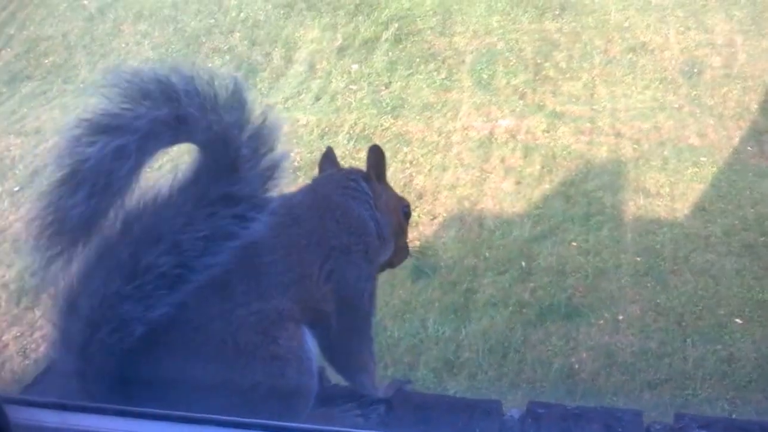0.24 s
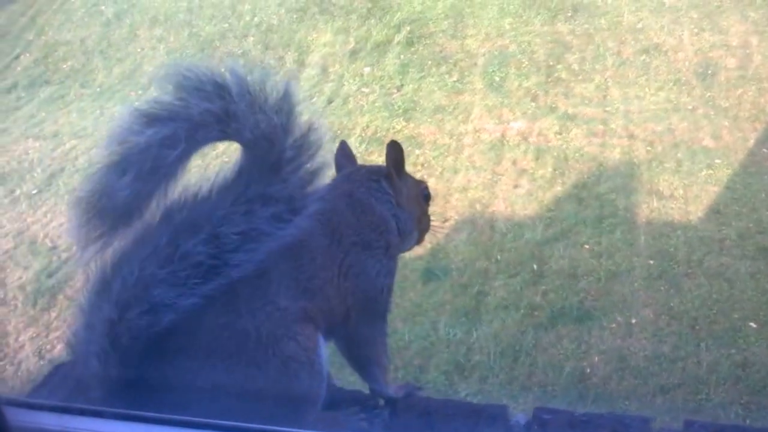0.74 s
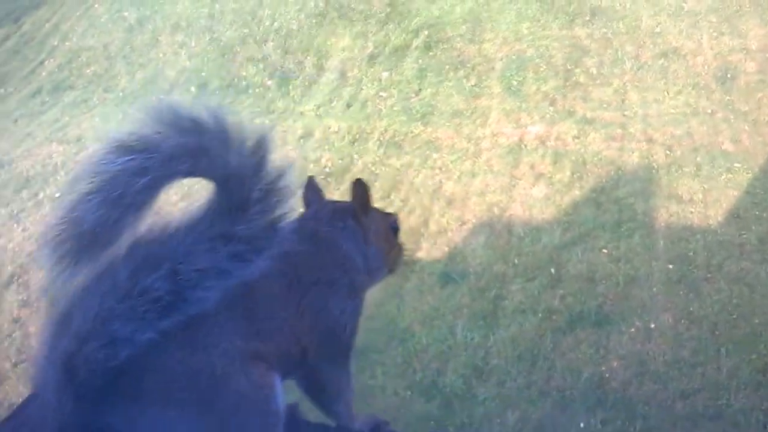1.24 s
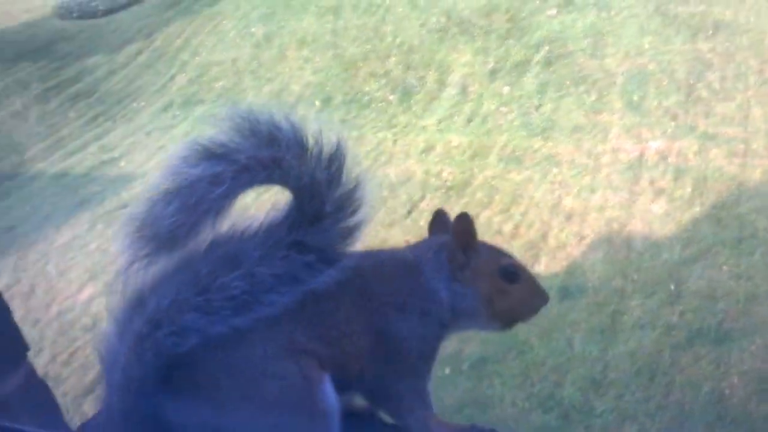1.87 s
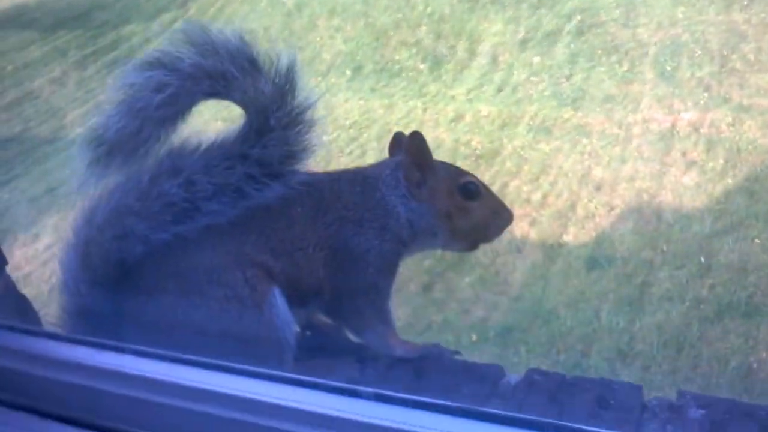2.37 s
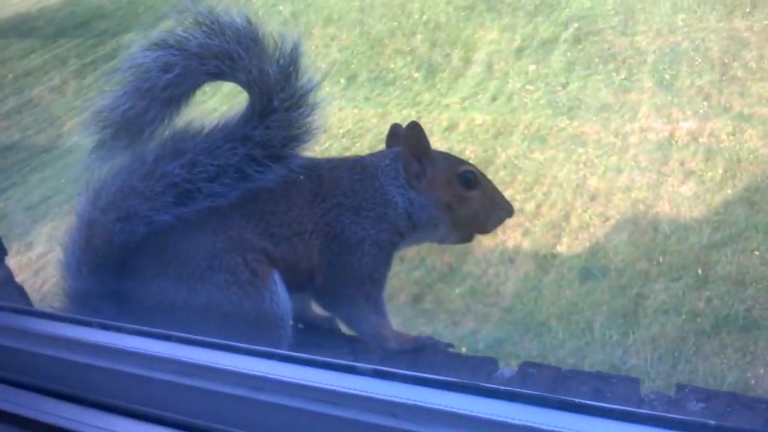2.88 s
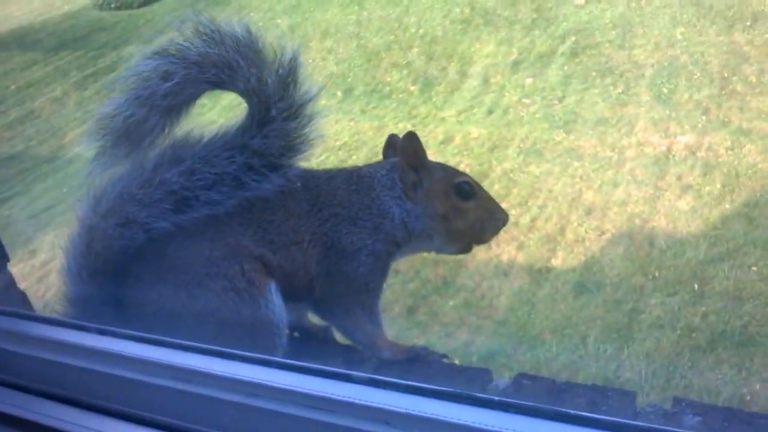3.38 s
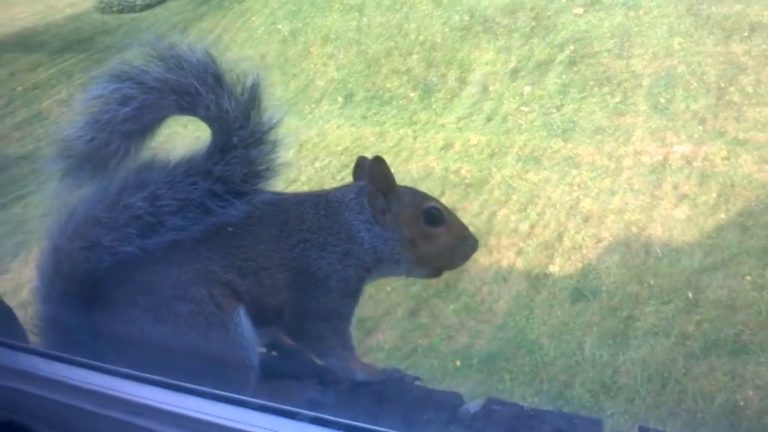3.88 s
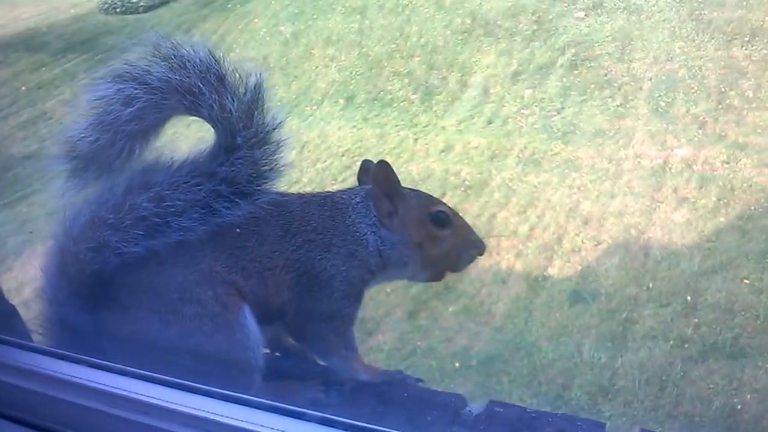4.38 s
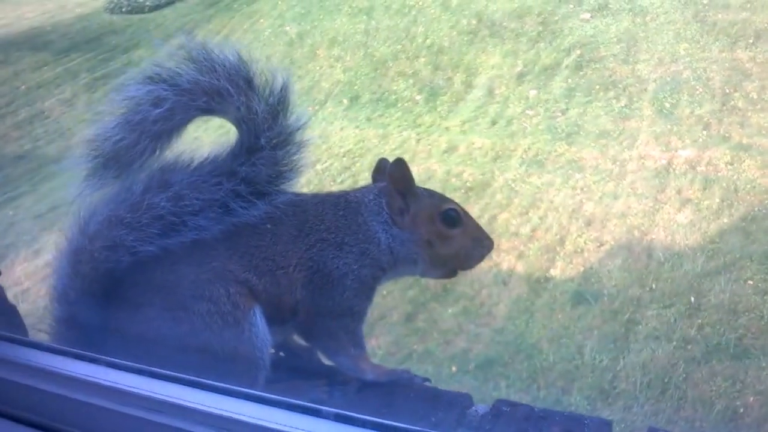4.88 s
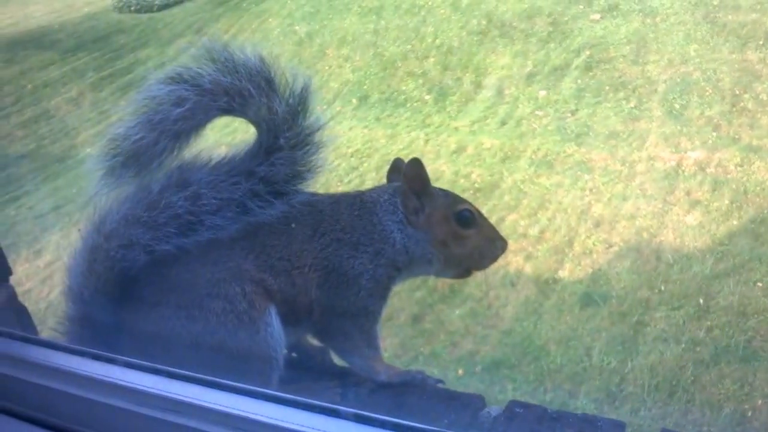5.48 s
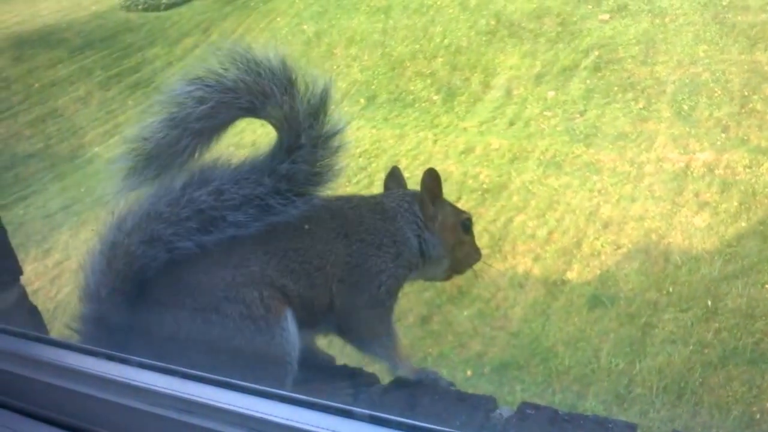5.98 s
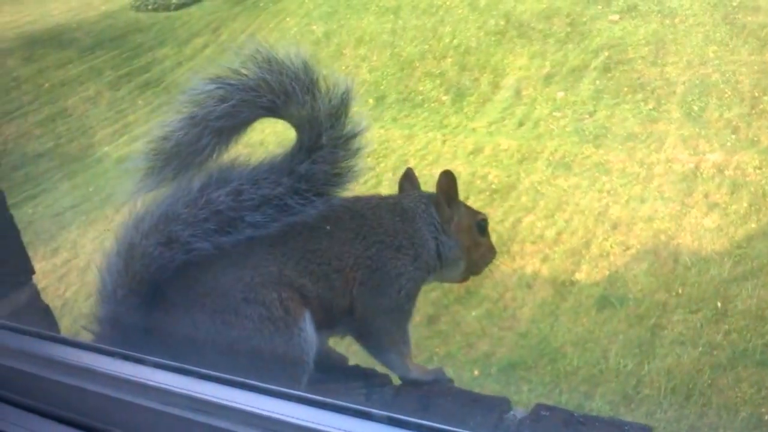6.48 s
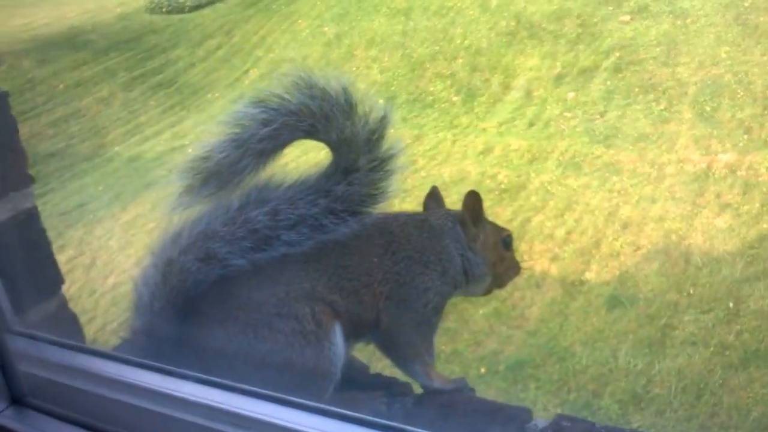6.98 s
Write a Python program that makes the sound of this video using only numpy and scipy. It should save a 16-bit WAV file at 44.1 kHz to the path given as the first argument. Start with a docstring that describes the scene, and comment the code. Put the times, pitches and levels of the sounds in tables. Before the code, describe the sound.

From behind a window, a squirrel is heard scolding close by: first a quick string of scratchy, squeaky barks mixed with slight shuffles and taps, then two long whines that crack and turn hoarse, then three barks and one more whine. The garden behind stays quiet, with a low rush of air, hissing insects, a far engine drone and a very faint whistle that comes and goes.

```python
"""A grey squirrel on a brick sill scolds with ten short raspy barks and three long whining squalls.
Its vocal folds beat strong-weak and slip between clean and rough; the throat sounds first, then the
mouth opens. Its fur and claws brush the sill, a few small knocks sound nearby, and the window recess
adds a brief echo. All is heard from behind the window, over a garden where the air rumbles softly,
insects hiss, a far engine drones and a faint whistle comes and goes."""
import sys
import numpy as np
from scipy import signal
from scipy.fft import rfft, irfft
from scipy.io import wavfile
from scipy.ndimage import uniform_filter1d

SR = 44100
rng = np.random.default_rng(int(sys.argv[2]) if len(sys.argv) > 2 else 0)


def digitize_waveform(pressure):
    """Quantize a signal to 16-bit integers and store it at the path in sys.argv[1].

    Rows of a 2-D input are taken as channels; values are limited to [-1, 1].
    """
    field = np.atleast_2d(pressure).T
    bounded = np.clip(field, -1, 1)
    quanta = np.round(bounded * 32767).astype(np.int16)
    wavfile.write(sys.argv[1], SR, quanta)


N = 318843
TIME = np.arange(N) / SR

# Barks: start t/s, main push delay/s, closing push delay/s, throat level/dB, main push level/dB,
# closing push level/dB, pitch f/Hz, roughness/0-1, sharpness/0-1, hiss level/dB,
# squeak level/dB against the mouth
BARKS = [ (0.191, 0.085, 0.093, -58, -52.5, -55, 641, 0.78, 1, -76, -20),
         (0.418, 0.04, .078, -52.5, -40.5, -51, 636.6, 0.42, 1, -57, -21),
         (0.636, 0.044, 0.073, -54, -43.5, -70, 617, 0.56, 0.98, -56, -15),
         (0.895, .037, 0.095, -56, -43.5, -54, 647.7, 0.59, 1, -56.5, 8),
         (1.196, 0.033, 0.094, -54.5, -46, -46.5, 638.4, 0.65, .71, -60, 13.5),
         (1.785, 0.049, 0.073, -48.5, -52, -53, 619, 0.53, 0.46, -55, -16),
         (2.11, 0.068, 0.11, -46, -46, -44.5, 610, 0.64, 0.26, -53.5, 1),
         (5.794, 0.05, 0.089, -47.5, -47, -47.5, 612, 0.33, 0.4, -62.5, -10),
         (6.029, 0.053, 0.077, -48, -49, -48.5, 603, 0.63, 0.2, -59.5, 14),
         (6.283, 0.069, 0.1, -49, -47, -44.5, 621, 0.74, 0.58, -60, -20)]
# Squalls: start t/s, length/s, delay until the voice cracks/s, delay until the throat drops/s,
# mouth level/dB, throat level/dB, opening strong-weak depth/0-1, ringing boost/dB,
# opening hiss level/dB against the mouth, high resonance's starting f/Hz, its level/dB,
# last mouth resonance f/Hz
SQUALLS = [ (2.703, 0.416, 0.128, .275, -36.5, -50.5, 0.67, 2.5, -26, 2530, -10, 1870),
           (4.057, 0.37, 0.096, 0.27, -38.5, -49.5, 0.43, 2.5, -28, 2570, -3, 1970),
           (6.842, .4, 0.124, 0.28, -40.5, -52.5, 0.24, 7.5, -33.5, 3010, -14.5, 1587)]
# The tune of each squall, one list apiece: t/s, pitch f/Hz
SQUALL_TUNES = [
    [(2.71, 586), (2.755, 637.7), (2.795, 657), (2.85, 584), (2.91, 572.2), (2.945, 526), (2.99, 555),
     (3.04, 517.4), (3.15, 530)],
    [(4.07, 529), (4.112, 613.6), (4.135, 618.6), (4.16, 556), (4.21, 575.4), (4.245, 552.5), (4.29, 534.8),
     (4.33, 551.3), (4.39, 522.6)],
    [(6.86, 540), (6.893, 621.5), (6.962, 630.7), (6.978, 553.4), (7.015, 574.4), (7.032, 556), (7.05, 582),
     (7.07, 548), (7.23, 521)],
]
# A "colour" says how strong the low and high parts of a sound are against each other.
# Voice colours of a sharp bark, a dull bark and a squall: f/Hz, level/dB
SHARP_COLOUR = [(200, -43), (420, -3.5), (630, -4.5), (950, -2), (1300, 1.5), (1500, -3), (1900, 2),
                (2350, 7), (2900, 1), (3650, -0.5), (4300, -19), (6000, -26), (12000, -59)]
DULL_COLOUR = [(200, -8.5), (450, -9), (620, 9.5), (900, 7), (1230, 6), (1550, 6), (1950, -0.5), (2350, 2),
               (2750, -29), (3200, -36), (3700, -38), (4500, -29.5), (12000, -29)]
SQUALL_COLOUR = [(200, -21.5), (420, -30), (600, -12.5), (720, -15), (850, 4), (960, -18), (1330, -12.5),
                 (1600, -4.5), (1900, -4), (2290, -5.5), (2550, -8.5), (2900, -16), (3350, -26),
                 (4500, -39)]
# Colours of the breath hissing through the teeth: f/Hz, level/dB
BARK_HISS_COLOUR = [(3000, 0), (4500, -6.5), (6200, 2), (7300, 8), (8700, -8.5), (10300, -2.5),
                    (12500, -19), (15500, -56)]
SQUALL_HISS_COLOUR = [(3000, -21), (4500, -20), (6300, 1.5), (7900, 16.5), (9500, 8), (10800, 9.5),
                      (12500, -5), (15500, -65)]
# Shuffles on the sill: loudest t/s, rise/s, fall/s, level/dB
SHUFFLES = [(.22, 0.06, 0.037, -62.5), (1.80, 0.096, 0.025, -64.5), (1.866, 0.027, 0.021, -50.5),
            (1.96, 0.038, 0.017, -56)]
# Colour of fur and claws on brick: f/Hz, level/dB
SHUFFLE_COLOUR = [(500, -0.5), (1800, 6), (3500, -4.5), (5200, 5), (6500, -4), (8700, 0.5), (10000, -8),
                  (11500, -17), (15500, -26)]
# Small knocks: t/s, peak level/dB, centre f/Hz, width/octaves, time to fade by 60 dB/s
KNOCKS = [(1.105, -59, 567, 0.34, 0.045), (1.163, -59.5, 500, 0.24, 0.024),
          (1.287, -46.5, 435, 0.91, 0.024), (1.289, -45.5, 3000, 0.74, 0.02),
          (1.523, -52.5, 2660, 0.57, 0.18), (1.9895, -44.5, 4500, 0.44, 0.0082)]
# Colours of the outdoor air and the insect chorus: f/Hz, level/dB
AIR_COLOUR = [(12, -79), (22, -5), (90, -3), (135, -2.5), (200, -12), (290, -15.5), (400, -20), (620, -20),
              (900, -24.5), (1700, -29.5), (3100, -29), (4200, -29), (6000, -58)]
INSECT_COLOUR = [(3000, -7.5), (4300, -11.5), (5150, 2), (5900, -8), (6800, -6.5), (7600, -14), (8400, -18),
                 (11000, -19.5), (15500, -18)]
# Swells of the far engine: loudest t/s, half width/s, f/Hz, level/dB
ENGINE_SWELLS = [(3.28, 0.29, 80.94, -65), (3.94, 0.18, 83.1, -61.5), (4.56, 0.046, 80.3, -60),
                 (6.25, 0.49, 88.9, -69), (7.15, .25, 80.5, -64.5)]
# Far whistles: start t/s, length/s, f/Hz, level/dB
WHISTLES = [(0.949, 0.22, 3650, -79), (3.6, 0.36, 3740, -74), (4.74, 0.42, 3700, -75.5),
            (5.727, 0.41, 3710, -77)]

CLOSING_RISE_S, CLOSING_FALL_DB_PER_S = 0.039, 909  # a bark's last push of air
SCOOP_S, CRACK_S = 0.023, 0.015  # how long a squall's rough start and its voice crack take


def bark(start, main_s, closing_s, throat_db, main_db, closing_db, pitch_hz, rough, sharp,
         hiss_db, squeak_db):
    """A short rasp: the mouth's resonance sweeps up into a squeak, and air hisses through the teeth."""
    age = np.arange(0, closing_s + .046, 1 / SR)
    progress = age / age[-1]
    dull = 1 - sharp
    pitch_arch = 1 + 0.0445 * (np.sin(np.pi * progress) - 1)
    buzz, puffs = vocal_folds(pitch_hz * pitch_arch, beat=1.0, rough=rough)
    throat, mouth = throat_and_mouth(
        buzz, puffs, lambda hz: sharp * colour_db(SHARP_COLOUR, hz) + dull * colour_db(DULL_COLOUR, hz))
    # a sharp bark starts with the mouth already open
    shut = dull * np.clip((.68 - progress) / 0.28, 0, 1)
    squeak_hz = 2340 + 2900 * (age - closing_s) * step(progress, 0.25, 0.2)
    sweep = resonate(buzz + 1.6 * puffs, squeak_hz + (1450 - squeak_hz) * shut, width_hz=220)
    squeak = resonate(puffs, squeak_hz, width_hz=160) * np.clip((progress - .5) / 0.4, 0, 1)
    until_closed = 1 - step(age, closing_s + .012, .006)
    mouth = steady(mouth + until_closed * (amp(-7) * sweep + amp(squeak_db) * squeak))
    # the hiss peaks early; a strong closing push brings more
    early_hiss = bell(age - 0.047, 0.025)
    closing_push = push(age - closing_s, CLOSING_RISE_S, CLOSING_FALL_DB_PER_S)
    hiss_gain = amp(hiss_db) * np.hypot(early_hiss, amp(closing_db - main_db - 13) * closing_push)
    # dull barks lose some of the hiss's highest treble
    hiss = ring(puffs, lambda hz: colour_db(BARK_HISS_COLOUR, hz) - dull * .003 * np.maximum(hz - 6800, 0))
    throat_gain, mouth_gain = bark_gains(age, main_s, closing_s, throat_db, main_db, closing_db)
    call = throat_gain * throat + mouth_gain * mouth + hiss_gain * unit_level(hiss)
    return start, call * signal.windows.tukey(len(age), .06)


def bark_gains(age, main_s, closing_s, throat_db, main_db, closing_db, attack_s=.01, peak_s=0.052):
    """A bark's loudness: the throat swells, sags and dies away; two pushes of air pass the mouth."""
    swell = np.minimum(age / attack_s, 1) * bell(np.minimum(age - peak_s, 0), 0.053)
    sag_db = 10.5 * np.clip((age - peak_s) / (closing_s - peak_s), 0, 1) ** 2
    release_db = 476 * np.maximum(age - closing_s, 0)
    throat = swell * amp(throat_db - sag_db - release_db)
    main = amp(main_db) * push(age - main_s, rise_s=0.47 * main_s, fall_db_per_s=520)
    closing = amp(closing_db) * push(age - closing_s, CLOSING_RISE_S, CLOSING_FALL_DB_PER_S)
    return throat, np.hypot(main, closing)


def push(t, rise_s, fall_db_per_s, crest_s=0.003):
    """A push of air that peaks at t = 0: a bell-shaped rise, a round top and a steady fall."""
    falling_s = np.hypot(np.maximum(t, 0), crest_s) - crest_s
    return bell(np.minimum(t, 0), rise_s) * amp(-fall_db_per_s * falling_s)


def squall(tune, start, length, crack_s, hold_s, mouth_db, throat_db, opening_beat, ring_db, hiss_db,
           edge_hz, edge_db, last_hz, ring_hz=2292, low_beat=0.53):
    """A long whine: the voice scoops up to a clean note, cracks, and goes on lower and hoarser."""
    age = np.arange(0, length + 0.044, 1 / SR)
    pitch_hz = np.interp(start + age, *np.transpose(tune))
    cracked = step(age, crack_s, CRACK_S / 2)
    # the voice rings louder and cleaner when its fourth harmonic (4 x pitch) meets ring_hz
    ringing = bell(4 * pitch_hz - ring_hz, 48)
    rough = np.clip(roughness(age, crack_s) * (1 - 0.21 * ringing), .02, 1)
    beat = opening_beat + (low_beat - opening_beat) * cracked
    pitch_hz = pitch_hz * (1 + 0.00904 * wander(48.3, len(age)))
    buzz, puffs = vocal_folds(pitch_hz, beat, rough, jitter=0.12, leak=0.48, waver=0)
    throat, mouth = throat_and_mouth(
        buzz, puffs, lambda hz: colour_db(SQUALL_COLOUR, hz), whoop_hz=887, whoop_s=0.035)
    # one harmonic stays clear through the rasp
    clean_buzz, _ = vocal_folds(pitch_hz, beat, rough, jitter=0.04, leak=0.15, waver=0)
    clear_note = mouth_note(clean_buzz, age, pitch_hz, cracked, last_hz)
    ring_note = resonate(buzz, ring_hz, width_hz=220) * amp(-7 + ring_db * ringing)
    # a high resonance climbs and grows, giving the whine its edge
    edge = resonate(buzz, edge_hz + 550 * age, width_hz=194) * amp(edge_db + 18 * (age - age.mean()))
    # hoarse stretches break up into short sputters
    sputter = amp(9 * rough * np.tanh(wander(130, len(age))))
    mouth = steady((mouth + clear_note + ring_note + edge) * sputter) * amp(ring_db * ringing)
    throat = throat * amp(4 * rough * wander(45, len(age)))
    hiss = unit_level(ring(puffs + .8 * buzz, lambda hz: colour_db(SQUALL_HISS_COLOUR, hz)))
    hiss *= amp(hiss_db - 32 * age)
    throat_gain, mouth_gain = squall_gains(age, length, hold_s)
    return start, amp(throat_db) * throat_gain * throat + amp(mouth_db) * mouth_gain * (mouth + hiss)


def squall_gains(age, length, hold_s, throat_on_s=.008, mouth_on_s=.017):
    """A squall's loudness: the throat leads and gives out early; the mouth swells, tires and shuts."""
    opening = bell(age, 0.034)
    release = amp(-1100 * np.maximum(age - length, 0))
    throat_db = -5 * opening - 15 * step(age, hold_s, .025)
    mouth_db = -15 * opening - 16 * age
    throat = step(age, throat_on_s, throat_on_s / 2) * amp(throat_db)
    mouth = step(age, mouth_on_s, 0.33 * mouth_on_s) * amp(mouth_db)
    return throat * release, mouth * release


def roughness(age, crack_s):
    """A squall starts rough, clears, cracks, then grows ever hoarser in fits."""
    onset = .65 * bell(age, SCOOP_S)
    crack = .24 * bell(age - crack_s, CRACK_S)
    hoarse = step(age, crack_s, CRACK_S) * (.16 + .48 * (age - crack_s))
    return .08 + onset + crack + hoarse * flutter(db=3.5, hz=22, count=len(age))


def mouth_note(buzz, age, pitch_hz, cracked, last_hz, width_hz=170, shuts_s=.32):
    """The mouth picks out harmonic 3 on the high note, otherwise harmonic 4, and last_hz as it shuts."""
    high = step(age, SCOOP_S + CRACK_S / 2, CRACK_S / 2) * (1 - cracked)
    third, fourth = (resonate(buzz, k * pitch_hz, width_hz) for k in (3, 4))
    open_note = high * third + (1 - high) * fourth
    shut = step(age, shuts_s, 0.016)
    return (1 - shut) * open_note + shut * resonate(buzz, last_hz, width_hz)


def vocal_folds(pitch_hz, beat, rough, jitter=0.13, waver=0.0035, leak=1.0):
    """The folds buzz: beat weakens every second cycle; rough shakes timing and size and leaks air."""
    count = len(pitch_hz)
    turns = np.cumsum(pitch_hz * (1 + waver * wander(68, count))) / SR
    turns += jitter * rough * wander(110, count)
    # tones lie at steps of half the pitch; higher ones lag, smearing each click into a chirp
    cycles = sum((beat if k % 2 else 1) * np.cos(np.pi * k * turns - .45 * k * k) for k in range(1, 26))
    cycles = unit_level(cycles) * (1 + 0.87 * rough * wander(290, count))
    puffs = unit_level((1 + 0.093 * np.cos(np.pi * turns)) * rng.standard_normal(count))
    air_share = np.clip(leak * rough, 0, 1)
    return np.sqrt(1 - air_share ** 2) * cycles + air_share * puffs, puffs


def throat_and_mouth(buzz, puffs, colour, whoop_hz=860, whoop_s=0.0076, split_hz=1380):
    """The throat rings with the lows and opens with a rising whoop of air; the mouth takes the highs."""
    def cut_db(ratio):
        return 10 * np.log10(1 + np.minimum(ratio, 2) ** 20)

    throat = ring(buzz, lambda hz: colour(hz) - cut_db(hz / split_hz))
    mouth = ring(buzz, lambda hz: colour(hz) - cut_db(split_hz / (hz + 1)))
    age = np.arange(len(buzz)) / SR
    whoop = 5.5 * resonate(puffs, whoop_hz + 4200 * age, width_hz=345) * bell(age, whoop_s)
    return steady(steady(throat) + whoop), steady(mouth)


def shuffles():
    """Fur and claws brush the brick in grainy swishes."""
    strokes = sum(amp(db) * bell(TIME - s, np.where(TIME < s, rise, fall))
                  for s, rise, fall, db in SHUFFLES)
    return strokes * unit_level(noise(SHUFFLE_COLOUR) * flutter(db=0.55, hz=400))


def knock(start, db, centre_hz, octaves, fade_s):
    """A small dead knock: a burst of noise around one frequency that dies at once."""
    age = np.arange(8192) / SR
    burst = rng.standard_normal(len(age)) * amp(-60 * age / fade_s)
    body = ring(burst, lambda hz: -20 * np.log10(1 + (np.log2((hz + 1) / centre_hz) / octaves) ** 4 / 2))
    return start, amp(db) * body / abs(body).max()


def window_recess(sound, fade_s=0.16, echo_db=-16, echoes_per_s=2000):
    """Sound bounces around the window recess, adding a brief patter of echoes."""
    age = np.arange(8192) / SR
    echoes = rng.standard_normal(len(age)) * (rng.random(len(age)) < echoes_per_s / SR)
    echoes *= amp(-60 * age / fade_s) * (age > .002)
    return sound + amp(echo_db) * signal.fftconvolve(sound, echoes / np.linalg.norm(echoes))[:N]


def outdoor_air():
    """A low rush of air that gently rises and falls."""
    return amp(-65.5) * noise(AIR_COLOUR) * flutter(db=1.3, hz=2)


def insect_chorus():
    """Many insects blend into one steady hiss."""
    return amp(-72.5) * noise(INSECT_COLOUR) * flutter(db=0.44, hz=50)


def far_engine(idle_db=-77.5):
    """An engine drones on a low note with a weak octave above; it throbs and now and then swells."""
    peak_s, _, note_hz, _ = np.transpose(ENGINE_SWELLS)
    hz = np.interp(TIME, peak_s, note_hz) * (1 + 0.03125 * wander(9.15))
    angle = 2 * np.pi * np.cumsum(hz) / SR
    drone = unit_level(np.sin(angle) + amp(-15) * np.sin(2 * angle))
    gain = amp(idle_db) + sum(amp(db) * bell(TIME - s, width) for s, width, _, db in ENGINE_SWELLS)
    return drone * gain * flutter(db=2.5, hz=23)


def lone_insect(hz=7600, width_hz=260, db=-84, pulses_per_s=2.3):
    """One insect pulses softly, high above the rest."""
    pulse = 0.19 + np.sin(np.pi * (pulses_per_s * TIME + 0.62 * wander(0.88))) ** 2
    angle = 2 * np.pi * np.cumsum(hz + 90 * wander(1.6)) / SR
    return amp(db) * unit_level(pulse * wander(width_hz) * np.sin(angle))


def far_whistle(start, length, hz, db):
    """A faint, fuzzy whistle far away that fades in and out."""
    count = len(np.arange(0, length, 1 / SR))
    tone = resonate(rng.standard_normal(count), hz + 50 * wander(11, count), width_hz=110)
    tone *= flutter(db=4, hz=31, count=count)
    return start, amp(db) * unit_level(tone) * signal.windows.tukey(count, .9)


def amp(db):
    """Turns decibels into a gain to multiply by."""
    return 10 ** (np.asarray(db) / 20)


def unit_level(x):
    """Scales a sound to an average level (rms) of 1."""
    return x / np.sqrt(np.mean(x ** 2) + 1e-20)


def steady(x, size=700):
    """Holds the running level near 1, leaving the fast flutter."""
    power = uniform_filter1d(uniform_filter1d(x ** 2, size), size)
    return x / np.sqrt(abs(power) + 1e-20)


def step(t, at, width):
    """A smooth step from 0 to 1."""
    return .5 + .5 * np.tanh((t - at) / width)


def bell(x, width):
    """A smooth hump that reaches 1 at x = 0."""
    return np.exp(-(x / width) ** 2)


def colour_db(colour, hz):
    """Looks up a colour table's level at hz, sliding between its points."""
    points_hz, db = np.transpose(colour)
    return np.interp(np.log(hz + 1), np.log(points_hz + 1), db)


def noise(colour):
    """Noise of a given colour, as long as the scene, at a level of 1."""
    gains = amp(colour_db(colour, np.fft.rfftfreq(N, 1 / SR)))
    return unit_level(irfft(rfft(rng.standard_normal(N)) * gains, N))


def wander(hz, count=N):
    """Random drift, mostly slower than hz, at a level of 1."""
    damping = np.sqrt(1 + (np.fft.rfftfreq(count, 1 / SR) / hz) ** 4)
    return unit_level(irfft(rfft(rng.standard_normal(count)) / damping, count))


def flutter(db, hz, count=N):
    """A gain that drifts up and down by about db, mostly slower than hz."""
    return amp(db * wander(hz, count))


def ring(x, colour, size=2048):
    """A filter that lets each pulse ring on in the peaks of colour(hz), given in dB."""
    log_gain = np.log(amp(colour(abs(np.fft.fftfreq(size, 1 / SR)))))
    # minimum phase: the ringing comes after the pulse, never before
    response = np.fft.ifft(np.exp(signal.hilbert(log_gain).conj())).real
    return signal.fftconvolve(x, response[:size // 2])[:len(x)]


def resonate(x, hz, width_hz):
    """A resonance: keeps a narrow band around hz, which may glide, and holds its level near 1."""
    spin = np.exp(2j * np.pi * np.cumsum(hz * np.ones(len(x))) / SR)
    decay = np.exp(-np.pi * width_hz / SR)
    band = signal.lfilter([(1 - decay) ** 2], [1, -2 * decay, decay * decay], x / spin)
    return steady((spin * band).real)


def add(mix, start, sound):
    """Mixes a sound in at a start time in seconds."""
    part = mix[max(round(start * SR), 0):][:len(sound)]
    part += sound[:len(part)]


def scene():
    """The squirrel and the knocks in the window recess, over the garden."""
    near = np.zeros(N)
    garden = outdoor_air() + insect_chorus() + far_engine() + lone_insect()
    for row in BARKS:
        add(near, *bark(*row))
    for tune, row in zip(SQUALL_TUNES, SQUALLS):
        add(near, *squall(tune, *row))
    for row in KNOCKS:
        add(near, *knock(*row))
    for row in WHISTLES:
        add(garden, *far_whistle(*row))
    return (window_recess(near + shuffles()) + garden)[None]


def record(dry):
    """Cuts away the highest treble, above 15700 Hz."""
    treble_cut = signal.firwin(511, 15700, window=("kaiser", 9), fs=SR)
    return signal.oaconvolve(dry, treble_cut[None], "same")


dry = scene()
out = record(dry)
digitize_waveform(out)
```